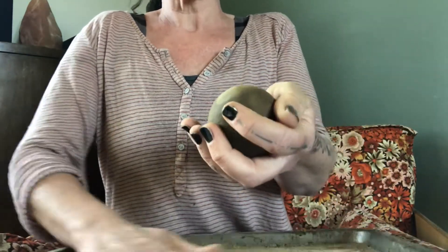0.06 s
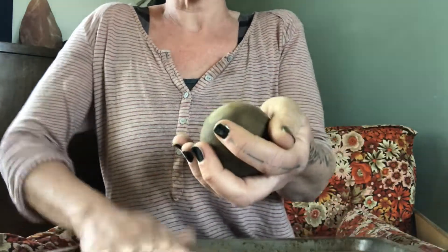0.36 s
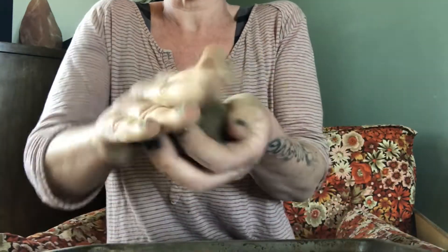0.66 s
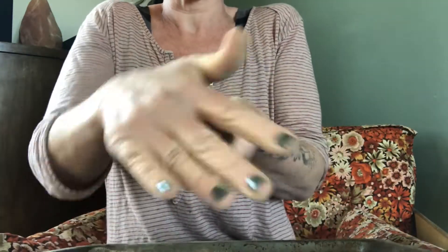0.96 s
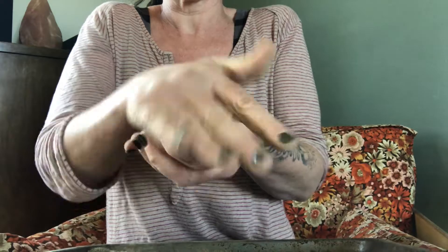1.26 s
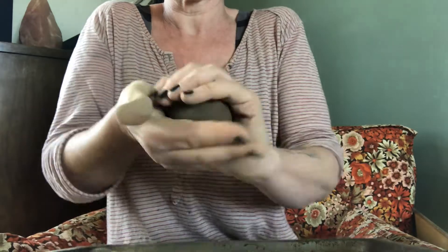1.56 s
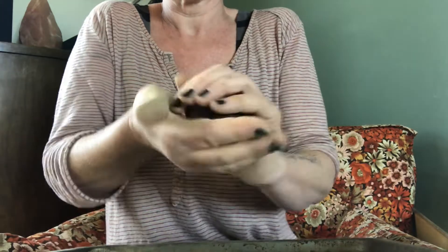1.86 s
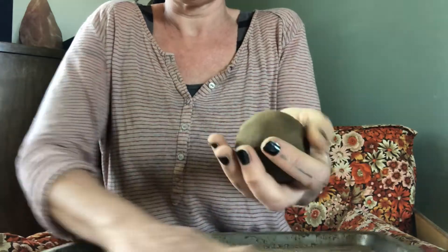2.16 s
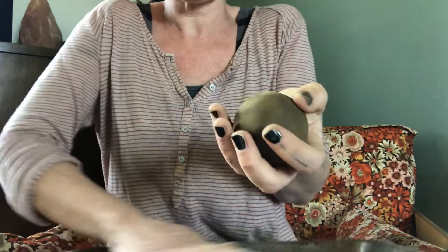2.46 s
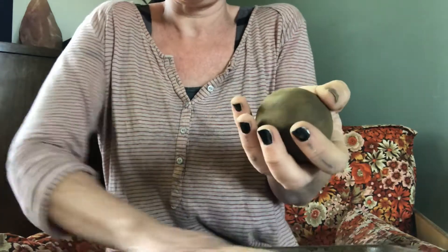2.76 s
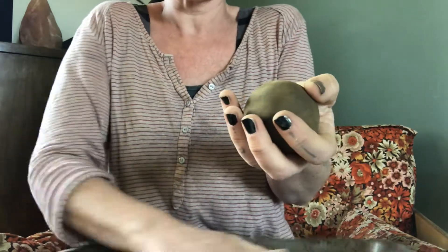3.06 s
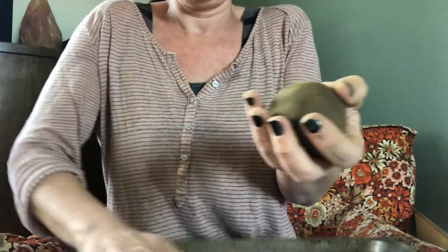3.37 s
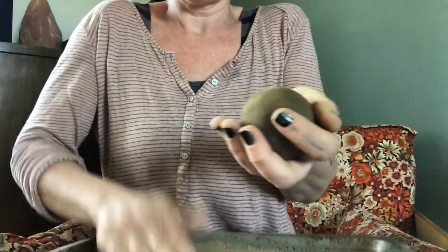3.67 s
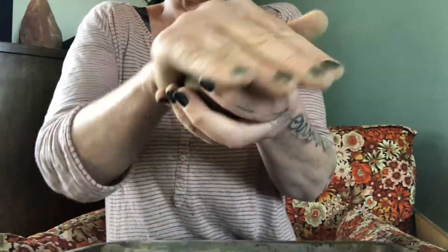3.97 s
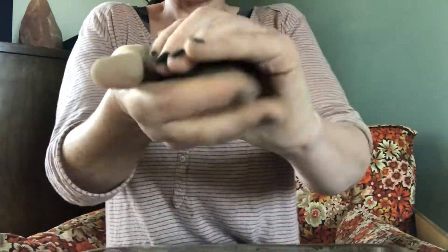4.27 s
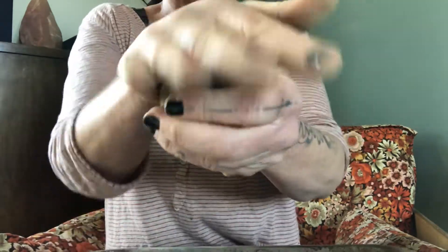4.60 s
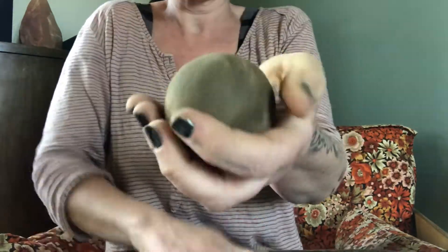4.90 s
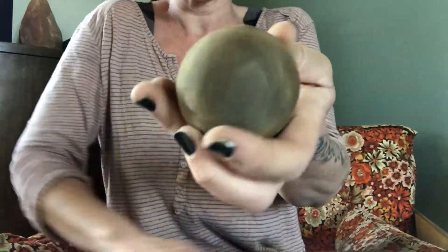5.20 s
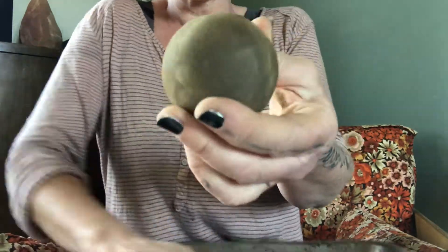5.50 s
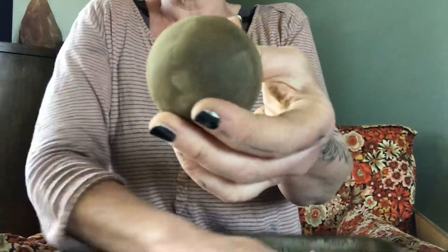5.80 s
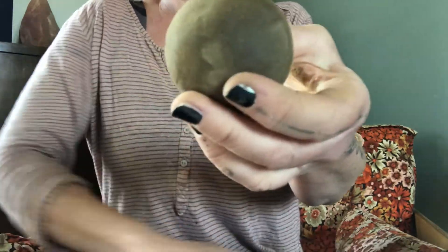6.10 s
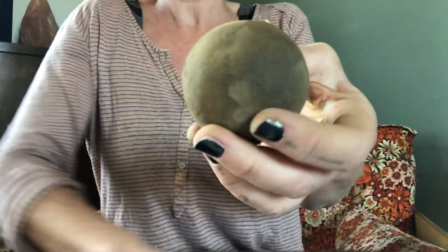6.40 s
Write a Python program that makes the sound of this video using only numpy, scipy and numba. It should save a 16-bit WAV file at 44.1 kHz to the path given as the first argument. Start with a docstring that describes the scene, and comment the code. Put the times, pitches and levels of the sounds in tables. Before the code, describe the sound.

Close, dusty hissing sweeps on a metal tray alternate with faint rubbing of a hard mud ball, ending in one sharp snap.

```python
"""Indoors and close up, a dry hand circles through soil dust on a metal tray: the grains hiss, the sheet
rings and booms softly when bumped. At 0.5 s the hand pats a hardened mud ball and rubs dust over it in
faint strokes, coloured by the hollow of the palm, with one small clink. It sweeps the tray again from
2.1 s, rubs the ball from 3.8 s, and after two more clinks is back on the tray at 4.9 s. At the very
end a coarse grain snaps against the metal. Faint room air lies under it all."""
import sys
import numpy as np
from scipy import signal
from scipy.fft import rfft, irfft
from scipy.io import wavfile
from numba import njit

SR = 44100
rng = np.random.default_rng(int(sys.argv[2]) if len(sys.argv) > 2 else 0)


def unload_audio(sound):
    """Save the sound as a 16-bit wav file, at the path given as the first command line argument."""
    columns = np.transpose(np.atleast_2d(sound))
    # keep every value between -1 and 1, then stretch to whole-number steps
    steps = np.round(np.clip(columns, -1, 1) * 32767)
    wavfile.write(sys.argv[1], SR, steps.astype(np.int16))


N = 293265
TIME = np.arange(N) / SR
FREQS = np.maximum(np.fft.rfftfreq(N, 1 / SR), 1)

# spells of circling on the tray:
# land_s, lift_s, attack_s, hiss_db, scrape_db, landing_weight_db, lifting_weight_db
TRAY_SPELLS = [(-.05, 0.425, .03, -37.5, -39, -53, -56), (2.075, 3.709, 0.04, -37, -38.5, -55.5, -54.5),
               (4.946, 6.7, 0.079, -37.5, -39, -54.5, -49)]
# pushes of the circling hand: fastest_s, length_s, speed_change_db, weight_change_db
HAND_PUSHES = [(0.18, 0.058, 3, 2.5), (2.226, 0.16, 2.5, -1), (2.394, 0.19, 4, 9), (2.511, 0.065, 4, -4),
               (2.649, 0.16, 6, 6.5), (2.88, .09, 1.5, 7.5), (2.95, 0.16, 2.5, 3), (3.117, 0.11, 3.5, 7),
               (3.216, 0.15, 2.5, -1), (3.352, 0.18, 4, 4), (3.564, 0.077, 2, -1.5), (3.643, 0.035, 0, 6),
               (5.125, 0.077, 2.5, -2.5), (5.345, 0.072, 3.7, -6), (5.45, .11, 4.5, 6),
               (5.568, 0.098, 3.3, -2), (5.697, 0.13, 3, 5), (5.804, .11, 4.5, -1), (5.887, 0.12, 5, 5.5),
               (6.065, .1, 2.5, 2), (6.168, 0.11, 3, 6), (6.27, .1, 4, 3), (6.366, 0.12, 2, 3.5),
               (6.485, 0.18, 4.5, 2.5), (6.61, 0.14, 3.5, -1)]
# the gap under the fingers resonates: strongest_s, length_s, from_hz, to_hz, level_db
FINGER_GAP_SWELLS = [(0.187, 0.079, 1960, 1900, -36.5), (2.28, .1, 2100, 1950, -35.5),
                     (2.298, .07, 3130, 3100, -38.5), (2.501, 0.063, 2200, 2200, -37.5),
                     (2.583, 0.16, 647, 408, -46), (2.969, .12, 2050, 1930, -37.5),
                     (3.206, .15, 1810, 2020, -38), (5.131, .08, 3140, 3200, -43),
                     (5.35, .075, 3280, 3280, -40), (5.586, .065, 3260, 3300, -38),
                     (5.704, 0.088, 416, 325, -48.5), (6.202, .17, 1700, 1840, -42)]
# tone of the fine dust: frequency_hz, level_db
HISS_EQ = [(1500, -35), (3000, -4), (4200, -3.5), (5200, -2), (6200, -4), (7400, -1.5), (9000, .5),
           (11000, -2.5), (13000, -3.5), (16000, -7.5)]
# tone of the coarser grains: frequency_hz, level_db
SCRAPE_EQ = [(200, -49), (600, -14), (950, -8), (1300, -4), (1700, -1.5), (2100, -1), (2750, -3.5),
             (3400, -4), (3900, -12), (5500, -20), (9000, -34)]
# tone of the palm dragging its weight: frequency_hz, level_db
WEIGHT_EQ = [(40, -57), (90, -35), (160, -15.5), (260, -6.5), (440, 3), (560, 1.5), (800, -5), (1200, -7.5),
             (2500, -41.5)]
# bending modes of the tray: pitch_hz, free_t60_s, level_db
TRAY_MODES = [(214, 0.22, -11), (264, 0.13, -8), (282, 0.18, -0.5), (352, 0.26, -0.5), (439, 0.17, 3),
              (487, 0.23, -6), (602, 0.43, 2.5), (675.7, 0.32, -0.5), (790, .15, -13.5)]
# sharper resonances of the sheet: pitch_hz, width_hz, boost_db
TRAY_PEAKS = [(1142, 22, 5.5), (1540, 18, 4), (1813, 33, 5), (2024, 52, 4.5), (2255, 28, 5.5),
              (2482, 67, 5), (3103, 61, 4.5), (3475, 100, 3.5), (4180, 49, 6)]
# the hand lands on, bumps or lets go of the tray: start_s, peak_db, ring_time_share
TRAY_BUMPS = [(0.098, -51, 0.05), (.18, -45.5, 0.18), (.434, -43, .85), (2.092, -32.5, 0.57),
              (2.655, -39, 0.4), (3.182, -39.5, 0.12), (3.724, -45, 0.57), (4.932, -39.5, 0.44),
              (5.426, -41.5, 0.5), (5.483, -39, 0.2), (5.68, -46, 0.6), (5.876, -42, 0.34),
              (6.18, -44, 0.5), (6.513, -46, .4)]
# strokes on the ball: fastest_s, rise_s, fall_s, level_db, palm_from_hz, palm_to_hz, palm_vs_friction_db
BALL_STROKES = [(.628, .086, 0.061, -46.5, 5566, 7000, -18), (.715, .04, 0.092, -46.5, 6300, 6360, -22),
                (.862, 0.045, 0.13, -45, 6900, 6700, -11), (1.025, 0.045, 0.046, -54, 6700, 6570, 5),
                (1.051, 0.027, .044, -49, 6500, 5200, -16), (1.108, 0.02, .046, -50, 7000, 7000, -14),
                (1.214, 0.039, 0.084, -49.5, 5200, 5200, -27), (1.3, 0.055, .1, -52.5, 7300, 6500, -3),
                (1.595, .108, 0.096, -46.5, 5600, 4270, -6), (1.87, 0.034, 0.053, -51, 3400, 3900, -7),
                (1.928, 0.056, 0.053, -49.8, 4120, 4700, -5), (2.003, .018, .028, -58, 5500, 5500, -6),
                (3.885, .056, .08, -55.5, 2800, 3100, -8), (3.938, .028, 0.054, -50.5, 3000, 3200, -11),
                (3.993, .045, 0.046, -47.5, 3500, 3900, -13), (4.045, 0.028, 0.059, -54, 4800, 4700, -14),
                (4.252, .036, 0.096, -47.5, 4951, 3830, -4.5), (4.406, .044, 0.06, -56, 3800, 4300, -19),
                (4.522, 0.023, 0.062, -51, 3700, 3600, -12), (4.635, 0.078, 0.058, -45.5, 4800, 4800, -17),
                (4.708, 0.042, 0.093, -51.5, 5100, 4900, -5)]
# tone of skin on powder: frequency_hz, level_db
SKIN_EQ = [(300, -25), (1200, -15.5), (2400, -13.5), (4000, -9), (6500, -6), (8000, -1.5), (9700, 0.5),
           (12000, -5), (14000, -1), (16000, -7)]
# the cupped palm's resonance and its two overtones: level_db
PALM_PARTIALS_DB = [-1, -17, -18]
# dusty pats of the free hand on the ball: start_s, level_db
BALL_PATS = [(.546, -52), (3.831, -59)]
# the ball turns in the holding hand: fastest_s, rise_s, fall_s, level_db
BALL_TURNS = [(.75, .205, .68, -64), (1.65, .17, .42, -72), (4.25, 0.39, .56, -64)]
# small hard contacts that chatter: start_s, length_s, peak_db, click_vs_ring_db
CLINKS = [(1.4423, .025, -35, -6), (4.657, .002, -45, 14), (4.9306, .007, -35, 3)]
# ring of one such contact: pitch_hz, t60_s, level_db
CLINK_MODES = [(2480, 0.032, -4.5), (2540, .02, -26), (2790, 0.049, -14), (3570, 0.0264, -17),
               (490, 0.038, -19.5)]
# tone of the room air: frequency_hz, level_db
ROOM_EQ = [(25, -30), (55, -16), (90, -2), (200, 0.5), (450, -1), (1000, -3), (1900, -4), (2600, -8),
           (3400, -5.5), (4500, -12), (8000, -13.5), (16000, -17)]
# soft resonant bands in the room air: pitch_hz, width_hz, boost_db
ROOM_PEAKS = [(1664, 100, 8.5), (3550, 170, 4.5)]


def tray_sweeps():
    """Fine dust hisses, coarser grains scrape the sheet, and the palm's weight drives its low modes."""
    hiss = colour(slips(per_s=22000, spread_db=0.1), HISS_EQ, TRAY_PEAKS)
    hiss = finger_bands(hiss, [4900, 7400, 10500, 14000], depth_db=1.06, width_share=0.2)
    scrape = colour(slips(per_s=11000, spread_db=0.3), SCRAPE_EQ, TRAY_PEAKS)
    scrape = finger_bands(scrape, [1300, 2200, 3200], depth_db=1.06, width_share=0.18)
    drag = colour(slips(per_s=2700, spread_db=2.0), WEIGHT_EQ)
    drive = colour(slips(per_s=3000, spread_db=2.5), WEIGHT_EQ)
    sheet = signal.fftconvolve(drive, ring(TRAY_MODES, time_share=0.8))[:N]
    body = unit(unit(drag) + 0.73 * unit(sheet))
    judder = undb(0.67 * wander(45) + 0.5 * wander(260))  # skin catches and lets go
    hiss_gain, scrape_gain, weight_gain = circling_hand()
    out = hiss * hiss_gain + scrape * scrape_gain + body * weight_gain
    for strongest, length, from_hz, to_hz, db in FINGER_GAP_SWELLS:
        span, pace = stroke(strongest, length / 2, length / 2)
        out[span] += undb(db) * arch(pace) * air_pocket(len(span), from_hz, to_hz, width_share=0.24)
    return judder * out


def circling_hand(ease_s=0.053, ease_db=-4, release_s=0.014):
    """Envelopes of hiss, scrape and weight: the hand lands, circles with the odd push, and lifts."""
    speed_db, lean_db = np.zeros((2, N))
    for fastest, length, faster_db, heavier_db in HAND_PUSHES:
        span, pace = stroke(fastest, length / 2, length / 2)
        speed_db[span] += faster_db * arch(pace)
        lean_db[span] += heavier_db * arch(pace)
    hiss, scrape, weight = np.zeros((3, N))
    for lands, lifts, attack, hiss_db, scrape_db, landing_db, lifting_db in TRAY_SPELLS:
        contact = np.clip((TIME - lands) / attack, 0, 1) ** 1.14
        contact *= undb(np.interp(TIME, [lifts - ease_s, lifts], [0, ease_db]))  # slows before lifting
        contact *= np.exp(-np.maximum(TIME - lifts, 0) / release_s)
        hiss += contact * undb(hiss_db + speed_db)
        scrape += contact * undb(scrape_db + 0.53 * speed_db)  # coarse grains gain less from speed
        weight += contact * undb(np.interp(TIME, [lands, lifts], [landing_db, lifting_db]) + lean_db)
    return hiss, scrape, weight


def tray_bumps(contact_s=0.011):
    """Soft flesh pushes slowly and wakes only the low modes; the resting hand damps them."""
    out = np.zeros(N)
    flesh = signal.butter(3, 340, fs=SR, output="sos")
    attack = np.minimum(TIME[:SR // 8] / contact_s, 1)
    for start, peak_db, time_share in TRAY_BUMPS:
        push = signal.sosfilt(flesh, burst(contact_s) * attack)
        add(out, start, signal.fftconvolve(push, ring(TRAY_MODES, time_share)), peak_db)
    return out


def grain_snap():
    """A coarse grain cracks against the tray, short and bright."""
    out = np.zeros(N)
    snap = burst(decay_s=0.0015)
    metal = ring([(590, 0.0061, -3), (1340, 0.0062, -1), (2100, 0.0062, -2)])
    sheet = signal.fftconvolve(snap, metal)[:len(snap)]
    add(out, start_s=6.6412, sound=unit(snap) + 1.1 * unit(sheet), peak_db=-8)
    return out


def ball_rubs(touch_s=0.011, leave_s=0.035, slow_db=-10.5, pat_decay_s=0.012):
    """Skin slides on powder as the ball is stroked, patted and turned; the palm colours each stroke."""
    friction = colour(slips(per_s=30000, spread_db=0.5), SKIN_EQ)
    friction = finger_bands(friction, [6500, 8600, 10600, 14000], depth_db=2.0, width_share=0.16)
    out = np.zeros(N)
    for fastest, rise, fall, db, from_hz, to_hz, palm_db in BALL_STROKES:
        span, pace = stroke(fastest, rise, fall)
        t = TIME[span] - fastest
        palm = sum(undb(partial_db) * air_pocket(len(span), k * from_hz, k * to_hz, width_share=0.27)
                   for k, partial_db in enumerate(PALM_PARTIALS_DB, start=1))
        contact = np.clip(np.minimum((rise + t) / touch_s, (fall - t) / leave_s), 0, 1)
        effort = undb(slow_db * (1 - pace))  # quieter at the slow ends of the stroke
        out[span] += undb(db) * contact * effort * unit(friction[span] + undb(palm_db) * palm)
    for start, db in BALL_PATS:
        pat = (TIME > start) * np.exp(-np.abs(TIME - start) / pat_decay_s)
        out += undb(db) * pat * friction
    turning = unit(colour(slips(per_s=6000, spread_db=4.0), SKIN_EQ))
    for fastest, rise, fall, db in BALL_TURNS:
        span, pace = stroke(fastest, rise, fall)
        out[span] += undb(db) * np.sqrt(arch(pace)) * turning[span]
    flutter = undb(1.03 * wander(120))
    return out * flutter


def clinks(gap_s=0.0044, jitter_share=0.02, scatter_db=1.5):
    """A hard contact, as of a fingernail, chatters; every touch is a dry click and a brief ring."""
    out = np.zeros(N)
    tone = ring(CLINK_MODES)[:SR // 8]
    soften = signal.butter(1, [350, 2200], "bandpass", fs=SR, output="sos")
    for start, length, peak_db, click_db in CLINKS:
        for delay in np.arange(0, length, gap_s):
            late, strength = rng.standard_normal(2)
            click = undb(click_db) * signal.sosfilt(soften, burst(decay_s=0.005))
            onset = start + delay + jitter_share * gap_s * late
            add(out, onset, tone + click, peak_db + scatter_db * strength)
    return out


def room_reverb(dry, t60_s=0.37, predelay_s=0.006, send_db=-18.5):
    """A furnished room returns a short, dull tail."""
    t = TIME[:SR // 2]
    tail = rng.standard_normal(len(t)) * np.exp(-np.log(1000) * t / t60_s) * (t > predelay_s)
    wet = signal.fftconvolve(dry, tail / np.linalg.norm(tail))[:N]
    return undb(send_db) * signal.sosfilt(signal.butter(2, 4500, fs=SR, output="sos"), wet)


def room_tone(level_db=-62.5):
    """A faint, nearly steady bed of air with two soft resonant bands."""
    air = unit(colour(rng.standard_normal(N), ROOM_EQ, ROOM_PEAKS))
    return undb(level_db + 0.5 * wander(8.4)) * air


def slips(per_s, spread_db):
    """Tiny random slips of dust grains, uneven in size."""
    hits = rng.random(N) < per_s / SR
    return unit(hits * rng.standard_normal(N) * undb(spread_db * rng.standard_normal(N)))


def finger_bands(x, centres_hz, depth_db, width_share):
    """As the fingers change their angle, bands of the friction swell, fade and drift independently."""
    for hz in centres_hz:
        gain = undb(depth_db * wander(16))
        drifting_hz = hz * np.exp(0.07 * wander(7))
        x = x + (gain - 1) * bandpass(x, drifting_hz, width_share)
    return unit(x)


def air_pocket(samples, from_hz, to_hz, width_share):
    """Friction noise rings in a pocket of air whose pitch glides."""
    hz = np.geomspace(from_hz, to_hz, samples)
    band = bandpass(rng.standard_normal(samples), hz, width_share)
    return unit(bandpass(band, hz, width_share))


def ring(modes, time_share=1):
    """Modes (pitch_hz, t60_s, level_db) ring for a share of their free decay time."""
    t = TIME[:SR // 2]
    motion = sum(undb(db) * np.cos(2 * np.pi * hz * t) * np.exp(-np.log(1000) * t / (t60 * time_share))
                 for hz, t60, db in modes)
    radiation = signal.butter(2, 175, "highpass", fs=SR, output="sos")  # slow motion hardly radiates
    return signal.sosfilt(radiation, motion)


def burst(decay_s):
    """A short, rough contact: noise that dies away."""
    t = TIME[:SR // 8]
    return rng.standard_normal(len(t)) * np.exp(-t / decay_s)


def stroke(fastest_s, rise_s, fall_s):
    """Sample indices and pace, 0-1, of one gesture that speeds up steadily and slows again."""
    start, end = fastest_s - rise_s, fastest_s + fall_s
    span = np.arange(int(start * SR), min(int(end * SR), N))
    return span, np.interp(TIME[span], [start, fastest_s, end], [0, 1, 0])


def arch(pace):
    """Round off a rise and fall."""
    return np.sin(np.pi / 2 * pace)


def wander(turns_per_s):
    """Smooth random modulation with a spread near 1."""
    values = rng.standard_normal(N // 20)
    return 1.2 * np.interp(TIME * turns_per_s, np.arange(len(values)), values)


def colour(x, curve, peaks=()):
    """EQ with a smooth curve and narrow resonant peaks on top."""
    hz, db = np.transpose(curve)
    gain_db = np.interp(np.log(FREQS), np.log(hz), db)
    for centre, width, boost in peaks:
        gain_db += boost / (1 + (2 * (FREQS - centre) / width) ** 2)
    return irfft(rfft(x) * undb(gain_db), N)


@njit
def bandpass(x, hz, width_share):
    """Sweepable state-variable band-pass; width_share is width over centre."""
    out, band_state, low_state = np.empty(len(x)), 0., 0.
    for i in range(len(x)):
        g = np.tan(np.pi * min(hz[i] / SR, 0.45))
        band = (band_state + g * (x[i] - low_state)) / (1 + g * (g + width_share))
        band_state = 2 * band - band_state
        low_state += 2 * g * band
        out[i] = width_share * band
    return out


def add(out, start_s, sound, peak_db):
    """Drop a sound into the mix at the given peak level."""
    start = min(int(start_s * SR), N - 1)
    part = sound[:N - start]
    out[start:start + len(part)] += undb(peak_db) * part / np.abs(sound).max()


def undb(db):
    """Decibels to gain."""
    return 10 ** (np.asarray(db) / 20)


def unit(x):
    """Scale to rms 1."""
    return x / np.sqrt(np.mean(x ** 2))


def scene():
    """Hands, reverb and room tone, all dead centre."""
    hands = tray_sweeps() + tray_bumps() + grain_snap() + ball_rubs() + clinks()
    return np.tile(hands + room_reverb(hands) + room_tone(), (2, 1))


def record(dry):
    """The phone thins the deep bass and cuts the top steeply."""
    low_cut = signal.butter(3, 62, "highpass", fs=SR, output="sos")
    high_cut = signal.ellip(12, 0.1, 80, 15850, fs=SR, output="sos")
    return signal.sosfilt(high_cut, signal.sosfilt(low_cut, dry))


dry = scene()
out = record(dry)
unload_audio(out)
```